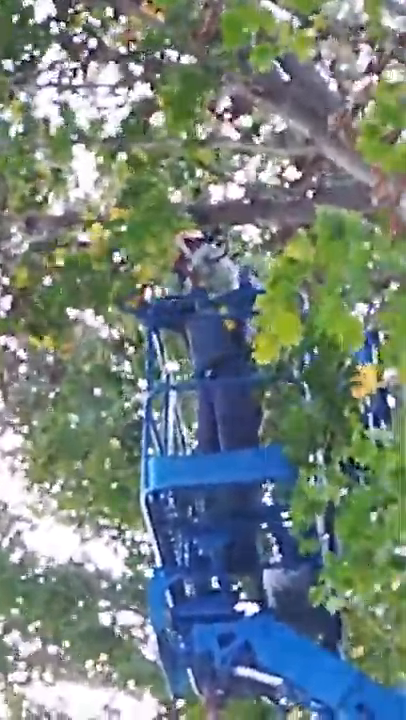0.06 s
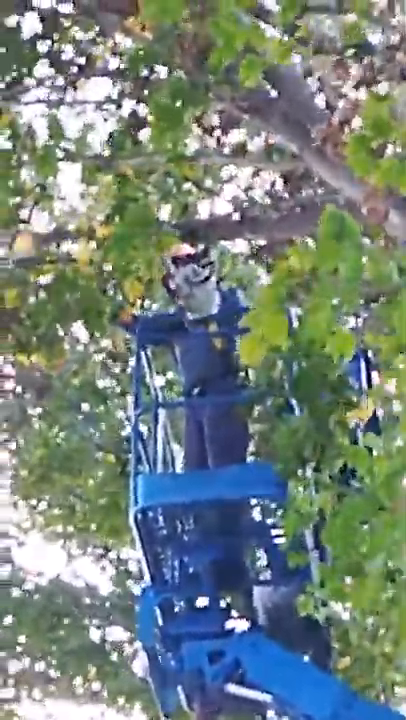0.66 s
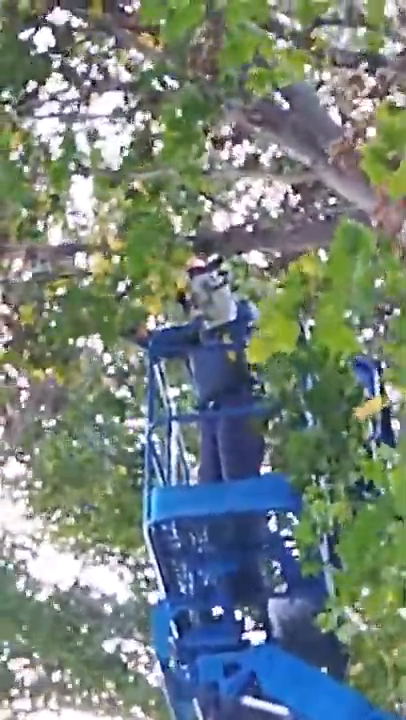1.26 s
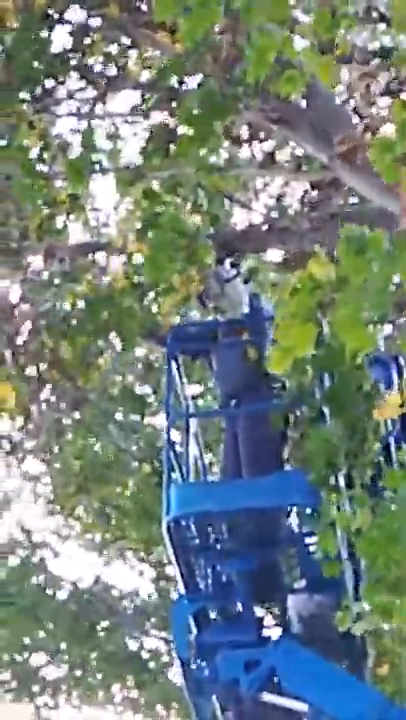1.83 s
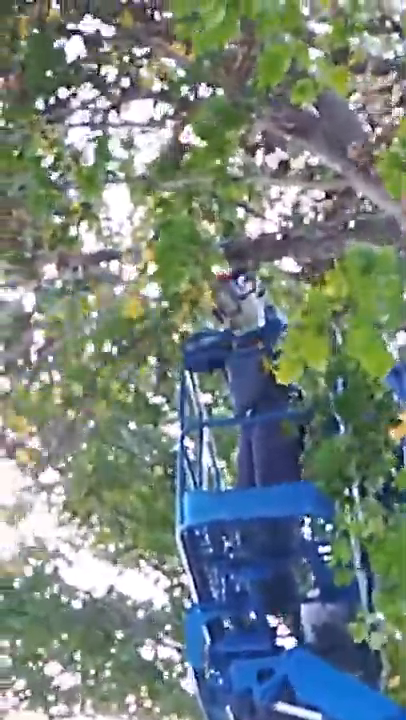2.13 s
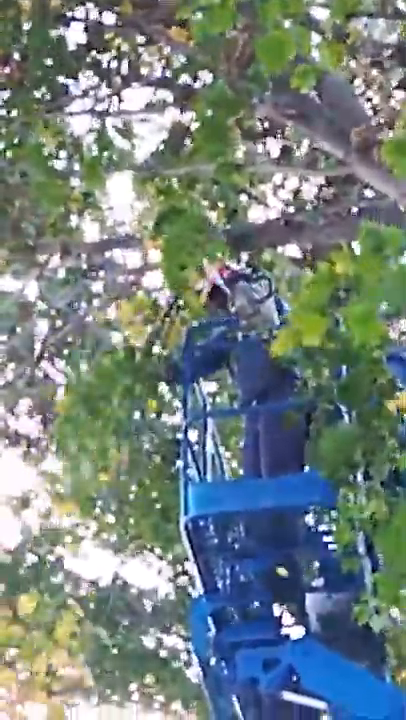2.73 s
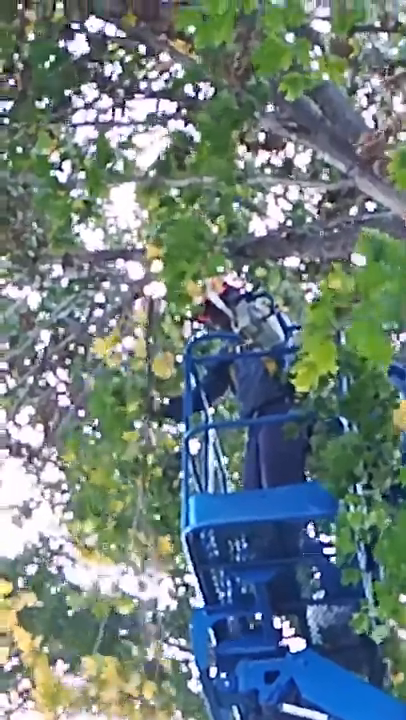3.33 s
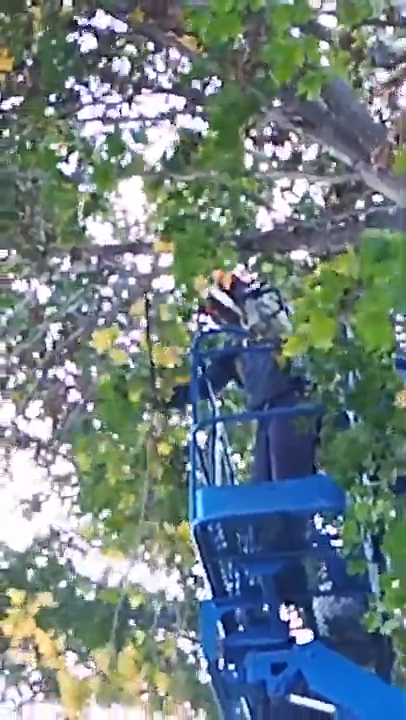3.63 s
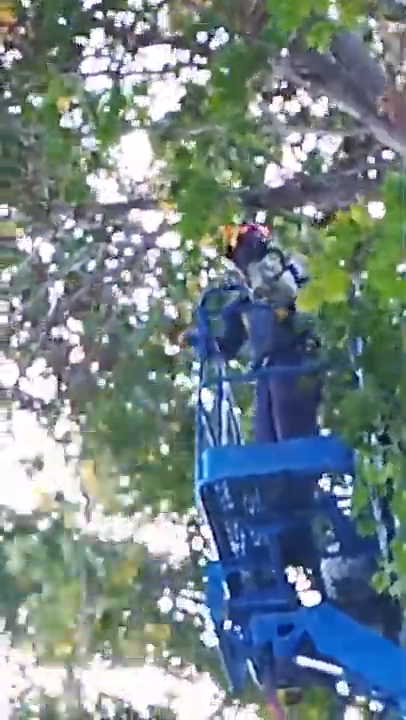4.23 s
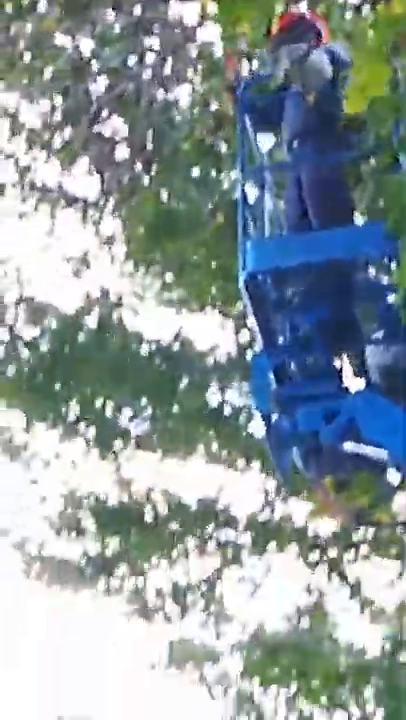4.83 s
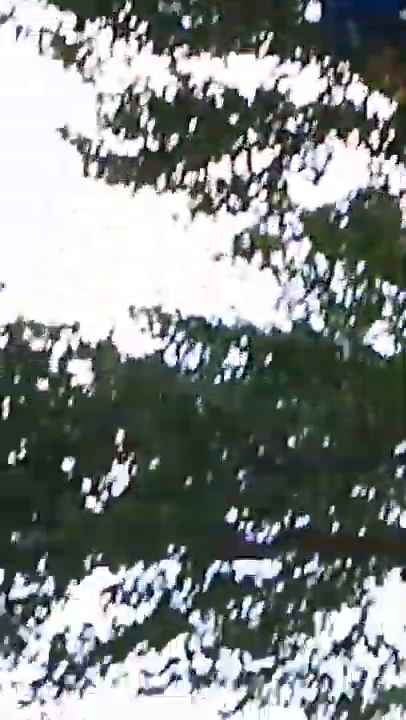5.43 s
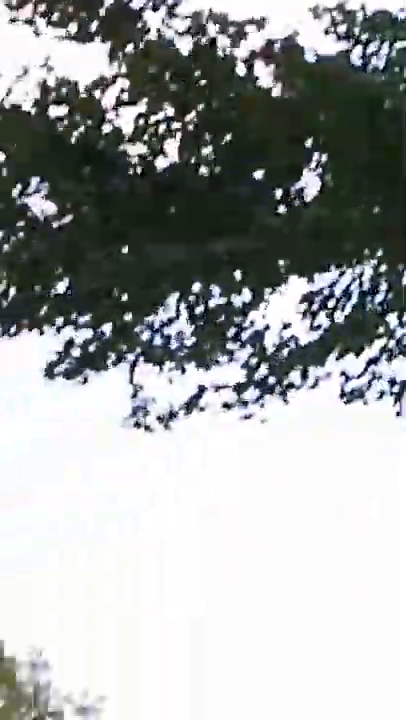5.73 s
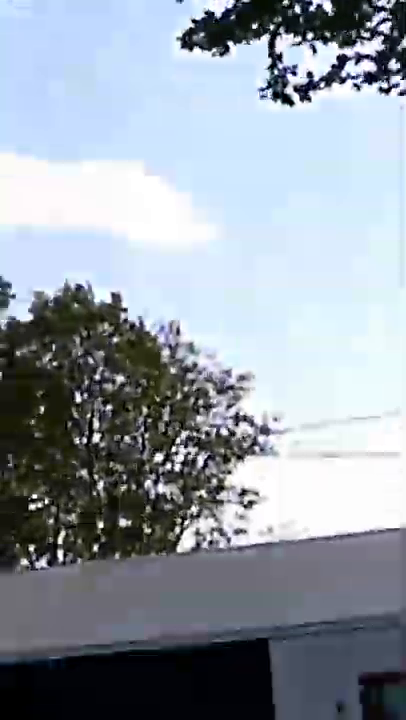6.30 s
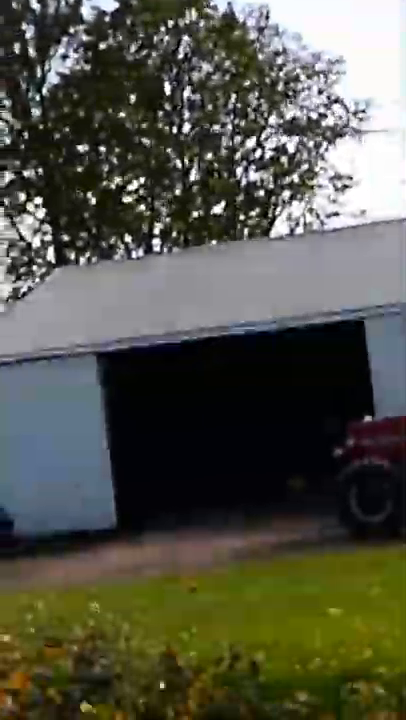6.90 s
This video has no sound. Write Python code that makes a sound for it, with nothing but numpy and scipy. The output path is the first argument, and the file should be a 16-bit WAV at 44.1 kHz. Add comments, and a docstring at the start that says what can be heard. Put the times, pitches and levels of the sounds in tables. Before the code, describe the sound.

A two-stroke chainsaw idles up in a tree, with dry, uneven pops and a light jingle of loose chain, echoing briefly around an open yard. At about 0.9 seconds it revs up hard, rising quickly to a loud, rasping whine with a bright chain hiss. Near top speed, from about 1.8 seconds, it misfires and stutters. The throttle shuts at 2.2 seconds and the pitch falls as the saw coasts down, the hiss fading by about 3 seconds. The stumbling idle then continues to the end at about 7 seconds. The chain grazes twigs with short, hissing rasps around 3.3 to 3.6 seconds and again at 5.3. A low engine drones steadily underneath the whole time. Wind rumbles on the microphone, with frequent short buffeting gusts from about 3.4 seconds onward, the hardest near 6.1.

```python
"""A two-stroke chainsaw up in a tree, worked from a lift. It idles in uneven pops, revs up once,
misfires at top speed, coasts down, and later rasps briefly against twigs. Each burst of burnt fuel
rings in the muffler and echoes off the ground and the yard, while the steel chain hisses and rattles.
A low engine drones below, and wind buffets the microphone."""
import sys
import numpy as np
from scipy import signal
from scipy.fft import rfft, irfft
from scipy.io import wavfile
from scipy.ndimage import uniform_filter1d

SR = 44100
rng = np.random.default_rng(int(sys.argv[2]) if len(sys.argv) > 2 else 0)


def to_wav(s):
    """Save 16-bit WAV."""
    ch = np.atleast_2d(s).T  # columns
    pcm = np.round(np.clip(ch, -1, 1) * 32767)  # PCM
    wavfile.write(sys.argv[1], SR, pcm.astype(np.int16))


N = 311346
TIME = np.arange(N) / SR
FREQS = np.arange(N // 2 + 1) * SR / N
THROTTLE_OPENS_S, THROTTLE_SHUTS_S, THROTTLE_TRAVEL_S = 0.906, 2.185, 0.013
CLUTCH_GRIPS_S, CLUTCH_SLIP_S, CLUTCH_FREES_S = 0.888, 0.17, 2.68


# How fast the engine turns with the trigger held: time_s, turns_per_s
REV_UP = [(0.93, 68.5), (1.17, 122.2), (1.3, 147), (1.37, 159), (1.43, 159.9), (1.47, 162.7),
          (1.518, 163.1), (1.694, 168.4), (1.892, 171), (2.0, 164.6), (2.032, 168.3), (2.118, 170),
          (2.15, 175), (2.183, 177)]
def crank_speed():
    """Turns per second: the throttle drives them up, then friction brakes them, less and less."""
    brake_turns_per_s2, eases_s, slowest = 304, 0.7, 50
    coasted_s = np.maximum(TIME - REV_UP[-1][0], 0)
    lost = brake_turns_per_s2 * eases_s * (1 - np.exp(-coasted_s / eases_s))
    return np.maximum(in_time(REV_UP)[0] - lost, slowest)


def by_speed(level_db, db_per_doubling):
    """Faster is louder: a gain that would reach level_db at 201.4 turns per second."""
    return from_db(level_db + db_per_doubling * np.log2(crank_speed() / 201.4))


# Strength that misfiring strokes lose (0 to 1): time_s, every_second, every_third, after_the_third
MISFIRES = [(1.0, .2, 0, 0), (1.3, .1, 0, 0), (1.42, .35, 0, 0), (1.75, .45, .05, 0), (1.83, .15, .15, 0),
            (1.86, 0, .9, 0), (1.97, 0, .95, .2), (2.01, 0, .85, .65), (2.14, 0, .85, .6),
            (2.18, 0, .6, .2), (2.2, 0, 0, 0)]
def strokes(jitter_s, uneven_db, waver):
    """One kick per engine turn. Misfiring weakens every second kick, then one or two in three."""
    turns = np.floor(np.cumsum(crank_speed() * (1 + waver * drift(22))) / SR)
    at = np.flatnonzero(np.diff(turns))
    second, third, after = (np.clip(loss[at], 0, 1) for loss in in_time(MISFIRES))
    count = np.arange(len(at))
    sizes = (1 - second * (count % 2)) * (1 - third * (count % 3 == 0)) * (1 - after * (count % 3 == 1))
    time_slip, size_slip = rng.standard_normal((2, len(at))) * (1 + 1.2 * third)
    return clicks(at / SR + jitter_s * time_slip, sizes * from_db(uneven_db * size_slip))


# Hoarse rushing gas, compared with the kicks: time_s, level_db
GAS_RUSH = [(.93, 3), (1.1, -6), (1.35, -15), (1.51, -16), (1.6, -4), (1.68, -7), (1.8, -14), (1.9, -7),
            (2.03, -3), (2.17, -5), (2.24, -15), (2.8, -12)]
# The muffler's tone when the engine works hard, and when it runs easy: pitch_hz, level_db
HARD_TONE = [(165, -8), (330, -20), (460, -17), (650, -10), (830, -2.5), (1030, -1), (1250, 0), (1450, -2),
             (1750, -11), (2030, 1), (2200, -4), (2470, 4), (2800, -9), (3500, -6), (4500, -17),
             (7000, -14), (16000, -40)]
EASY_TONE = [(150, 1.5), (400, 2), (620, 3), (850, 7.5), (1080, 9), (1330, 7), (1600, 5), (1800, 9),
             (2400, -0.5), (3000, -9.5), (7000, -1.5), (16000, -21)]
# The exhaust's main note and its upper whine: time_s, pitch_hz, level_db
PIPE_NOTE = [(.95, 840, -8), (1.02, 596, -14), (1.08, 855, 2), (1.16, 1050, -10), (1.26, 1140, -7),
             (1.38, 1210, -3), (1.52, 1270, 3), (1.6, 1400, -33), (1.8, 1280, -12), (2.16, 1250, -17),
             (2.25, 1850, -9), (2.45, 1620, -15), (2.62, 1370, 6), (2.8, 1250, -10)]
PIPE_WHINE = [(1.2, 2340, -24), (1.41, 2320, -14), (1.48, 2320, -5), (1.57, 2360, -8), (1.65, 2150, -10),
              (1.73, 2470, -15), (1.83, 2400, -9), (1.96, 1950, -9), (2.08, 2350, -14), (2.17, 2240, -17),
              (2.22, 2400, -26)]
def exhaust(kicks, dying_s):
    """Each stroke sends a sharp blow and a puff of gas through the muffler. Load hardens the tone."""
    puffs = level_out(die_away(kicks, decay_s=0.004) * rng.standard_normal(N))
    flow = chambers(level_out(kicks) + from_db(in_time(GAS_RUSH)[0]) * puffs, feedback=.45)
    released = ramp(THROTTLE_SHUTS_S, THROTTLE_TRAVEL_S)
    driven = ramp(THROTTLE_OPENS_S, THROTTLE_TRAVEL_S) - released
    coasting = released * (1 - ramp(CLUTCH_FREES_S, dying_s))
    misfiring = np.clip(in_time(MISFIRES)[1], 0, 1)
    pull = np.minimum(crank_speed() / 140, 1) ** 3.1  # full from 140 turns per second
    load = np.clip(driven * pull * (1 - 0.56 * misfiring) + coasting * 0.07, 0, 1)
    muffled = load * body(flow, HARD_TONE) + (1 - load) * body(flow, EASY_TONE)
    note = pipe_resonance(flow, PIPE_NOTE, decay_s=0.0025)
    whine = pipe_resonance(flow, PIPE_WHINE, decay_s=0.0028)
    choked_db = -5 * (1 - ramp(THROTTLE_OPENS_S, .16))  # extra fuel takes a moment to clear
    gain = driven * by_speed(-23, 4.3) * from_db(choked_db - 4 * misfiring)
    gain += coasting * by_speed(-29, 8.2)
    roar = level_out(muffled[0] + note + whine) * gain
    return outdoors(roar, echo_db=-9, echo_cut_hz=3200, scatter_db=-11, fade_s=.35)


def pipe_resonance(flow, curve, decay_s):
    """A ringing note that rises as the gas heats and sinks as it cools."""
    hz, level_db = in_time(curve)
    return from_db(level_db) * level_out(ring(flow, hz, decay_s).real)


# The sound's trip across each muffler chamber and back: delay_s
ROUND_TRIPS = [.00037, .00083, .00131, .00197]
def chambers(flow, feedback):
    """Each blow bounces between the muffler's walls and leaves spread over a few milliseconds."""
    for trip_s in ROUND_TRIPS:
        loop = np.r_[1, np.zeros(int(trip_s * SR) - 1), -feedback]
        flow = signal.lfilter(loop[::-1], loop, flow)
    return flow


# At idle the engine fires about every fourth turn, with stumbles: start_s, bark_db, crack_db
IDLE_POPS = [(0.0112, -35.5, -24), (0.0934, -38, -28.5), (0.1597, -36, -28.5), (0.23, -39, -25),
             (0.282, -35.5, -29), (0.3498, -43, -23), (0.432, -40, -28), (0.4982, -43, -29),
             (0.598, -38, -34), (0.6657, -37.5, -29), (0.7302, -35, -26.5), (0.7958, -36.5, -24),
             (0.8615, -35, -24), (2.9557, -36.5, -29), (3.1248, -36.5, -34), (3.2275, -37.5, -26.5),
             (3.3263, -41, -24.5), (3.4119, -34.5, -28), (3.506, -46, -33), (3.5677, -37, -26),
             (3.6515, -37.5, -27), (3.796, -39, -58), (3.8739, -39.5, -30.5), (3.954, -35, -28),
             (4.0294, -40, -31.5), (4.0854, -38, -33), (4.1614, -37, -34), (4.235, -41, -36),
             (4.352, -41.5, -39), (4.4087, -48, -46), (4.4713, -35, -30.5), (4.548, -36.5, -29),
             (4.6215, -37, -30.5), (4.6957, -36.5, -39), (4.7709, -36.5, -30.5), (4.8459, -36, -29),
             (4.9186, -36, -33), (4.976, -37.5, -32), (5.0492, -35.5, -29.5), (5.123, -35, -24),
             (5.1942, -38, -27.5), (5.2666, -36.5, -28), (5.3385, -43, -26.5), (5.3945, -35, -30),
             (5.4647, -40, -23), (5.5362, -38.5, -29.5), (5.6047, -38.5, -26.5), (5.674, -43, -35),
             (5.7459, -37, -29), (5.8175, -41, -26), (5.887, -40, -31), (5.9553, -39.5, -29),
             (6.0232, -41, -28), (6.089, -40, -29), (6.1597, -41.5, -29), (6.2426, -44, -34),
             (6.2946, -40.5, -30), (6.3634, -49, -32), (6.432, -54, -32), (6.5025, -44, -34),
             (6.5719, -39, -31), (6.6568, -48, -33), (6.7374, -40.5, -30), (6.804, -42, -31),
             (6.857, -37, -27.5), (6.9253, -40, -27), (6.9794, -39, -25.5), (7.048, -46, -24)]
# The tone of the pop at the outlet, and of its sharp crack: pitch_hz, level_db
POP_TONE = [(150, -18), (500, -13), (820, 1.5), (1080, -13), (1270, 2.5), (1700, -2), (2120, 0),
            (2400, -20), (3100, -4.5), (4500, -40), (9000, -33), (16000, -43)]
CRACK_TONE = [(1500, -1), (3200, -9), (4800, -7), (6500, 6.5), (8000, 0), (11000, -18), (16000, -25)]
def idle(pop_db, ring_db, gas_db, crack_db, shake_db):
    """Lone firings: a dry pop, the muffler's ring, a sharp crack and a shake of the slack chain."""
    times, bark_db, sharp_db = np.transpose(IDLE_POPS)
    kicks = clicks(times, from_db(bark_db))
    kicks += dead_strokes(times, turns_per_s=58, size_db=-54, uneven_db=2.5)
    gas = from_db(gas_db) * die_away(kicks, decay_s=.0016) * rng.standard_normal(N)
    pop = from_db(pop_db) * body(kicks + gas, POP_TONE)
    ringing = from_db(ring_db) * muffler_ring(times, bark_db, uneven_db=2.2)
    bark = outdoors(pop + ringing, echo_db=-12, echo_cut_hz=5000, scatter_db=-6, fade_s=.4)
    sharp = clicks(times, from_db(sharp_db))
    snap = from_db(crack_db) * die_away(sharp, decay_s=.0014)
    shake = from_db(shake_db) * die_away(sharp, decay_s=.02)
    crack = body((snap + shake) * stereo_noise(alike=0.11), CRACK_TONE)
    return bark + outdoors(crack, echo_db=-1, echo_cut_hz=9000, scatter_db=-7.5, fade_s=.35)


def dead_strokes(times, turns_per_s, size_db, uneven_db):
    """Between firings the engine keeps turning, and each unfired stroke gives a weak puff."""
    puff_times = []
    for start, end in zip(times, times[1:]):
        if end - start < .5:  # skip the long gap where the saw revs
            turns = max(round((end - start) * turns_per_s), 1)
            puff_times.extend(np.linspace(start, end, turns + 1)[1:-1])
    sizes = from_db(size_db + uneven_db * rng.standard_normal(len(puff_times)))
    return clicks(np.array(puff_times), sizes)


# The four notes the muffler rings with: pitch_hz, level_db, decay_s
MUFFLER_NOTES = [(840, -4, 0.0015), (1335, -1, 0.0028), (1810, -6.5, 0.0022), (2056, -2.5, 0.0042)]
# The tone shifts as saw and listener turn: time_s, ground_echo_s, then a pitch_ratio for each note
NOTE_SHIFTS = [(0, .0108, .95, 1.03, 1, 1.08), (.8, .0112, .95, 1.03, 1, 1.02),
               (3.4, .012, .97, 1.01, 1.02, 1), (4.1, .011, 1, .96, 1, 1),
               (5.05, .0105, 1.03, .95, .88, .97), (5.45, .0102, 1.02, 1.05, .88, 1.03),
               (6.25, .0088, 1, 1, 1, 1.02), (6.95, .0098, 1, .94, 1, .98)]
# How strongly the notes are heard: time_s, then a level_db for each note
NOTE_LEVELS = [(0, 1, 0.5, -2, -2), (.55, 6, 1, -9, -12), (.8, 2, 1.5, 0, 0), (3.3, -5, 1, 2, 0),
               (4.3, -6, -2.5, -3, 0.5), (5.4, 1, 1.5, -4, -1), (6.2, -2, 0.5, -2, 2), (7, -5, 4, -1, 0)]
# Bounces off nearby surfaces, timed from the ground echo: offset_s, level_db
NEAR_BOUNCES = [(-.0022, -7), (0, 0), (.006, -10)]
def muffler_ring(times, bark_db, uneven_db):
    """Each pop rings the muffler. The outlet faces away, so the ring is heard off nearby surfaces."""
    ground_s, *tunings = in_time(NOTE_SHIFTS)
    offset_s, bounce_db = np.transpose(NEAR_BOUNCES)
    arrivals = (times + np.interp(times, TIME, ground_s))[:, None] + offset_s
    arrivals += .00012 * rng.standard_normal(arrivals.shape)
    ringing = 0
    for (hz, db, decay_s), tuning, level_db in zip(MUFFLER_NOTES, tunings, in_time(NOTE_LEVELS)):
        strike_db = bark_db + uneven_db * rng.standard_normal(len(times))
        strikes = clicks(arrivals.ravel(), from_db(strike_db[:, None] + bounce_db).ravel())
        ringing += from_db(db + level_db) * ring(strikes, hz * tuning, decay_s).imag
    return ringing


# The tone of the chain running on its bar: pitch_hz, level_db
CHAIN_TONE = [(400, -32), (900, -25), (1500, -23.5), (2000, -20), (2750, -14.5), (3300, -4.5), (4200, -10),
              (5100, -12), (6000, -3), (7100, 0), (8200, -9), (9200, -10), (10800, -23), (14500, -21),
              (16000, -24)]
def running_chain(kicks, throb, knock_db):
    """Steel hisses and knocks, swelling with each stroke and with speed, until the clutch lets go."""
    pulsing = 1 + throb * (level_out(die_away(kicks, decay_s=0.0022)) - 0.5)
    rattle = stereo_noise(alike=0.02) + from_db(knock_db) * links(per_s=1900, spread_db=4.5)
    stopping_db = -89 * np.maximum(TIME - CLUTCH_FREES_S, 0)
    clutch = ramp(CLUTCH_GRIPS_S, CLUTCH_SLIP_S) * from_db(stopping_db)
    return body(rms_one(rattle * pulsing), CHAIN_TONE) * by_speed(-16, 6.5) * clutch


def links(per_s, spread_db):
    """Chain links knock at random moments; spread_db makes their force uneven."""
    sizes = from_db(spread_db * np.minimum(rng.exponential(1, N), 4)) * rng.choice([-1, 1], N)
    return rms_one(sizes * (rng.random(N) < per_s / SR))


# The chain touches twigs: start_s, level_db, rise_s, decay_s
TWIG_TOUCHES = [(3.31, -18, 0.042, 0.084), (3.529, -25, 0.058, 0.095), (3.63, -37, 0.063, 0.0061),
                (5.325, -23.5, 0.041, 0.11)]
# The tone of that scraping: pitch_hz, level_db
TWIG_TONE = [(1180, -58), (2000, -11.5), (2110, -13), (2490, -15.5), (3310, -7.5), (4860, -8), (7000, 5),
             (9740, -10.5), (11000, -18.5), (14400, -19), (16000, -28)]
def rasps(knock_db):
    """Teeth graze twigs: a quick swell of hiss and fine clicks that dies away."""
    swell = sum(from_db(db) * ramp(start, rise) ** 2 * fade_after(start + rise, decay)
                for start, db, rise, decay in TWIG_TOUCHES)
    scrape = stereo_noise(alike=0.037) + from_db(knock_db) * links(per_s=2400, spread_db=0)
    return swell * body(rms_one(scrape), TWIG_TONE)


# How loud the jingle is: time_s, level_db
JINGLE_LEVELS = [(0, -36), (.9, -35), (2.85, -39.5), (3.3, -38.5), (3.8, -43.5), (4.5, -39), (5.7, -38.5),
                 (6.32, -36.5), (6.7, -41.5), (7.06, -33.5)]
# The tone of the loose steel: pitch_hz, level_db
JINGLE_TONE = [(1400, -12.5), (2500, -8), (3400, -1), (4700, -7), (5800, 1), (7200, 3), (8400, -6.5),
               (9300, -6), (10800, -21.5), (14000, -18.5), (16000, -24)]
def jingle(knock_db, level_db, flutter_db):
    """The engine keeps the chain and clutch jingling."""
    rattle = rms_one(stereo_noise(alike=0.012) + from_db(knock_db) * links(per_s=370, spread_db=1))
    gain = from_db(in_time(JINGLE_LEVELS)[0] + level_db + flutter_db * drift(16))
    return body(rattle, JINGLE_TONE) * gain


# Notes of the bar and clutch drum: peak_s, pitch_hz, width_hz, level_db, half_length_s
STEEL_NOTES = [(.1, 9120, 120, -46, .13), (.56, 9120, 120, -44, .17), (.55, 1810, 50, -49.5, .25),
               (2.3, 3300, 200, -36, .08), (2.45, 3200, 170, -31, .08), (2.68, 3300, 260, -44, .07),
               (2.68, 9050, 110, -41, .08), (2.6, 13750, 150, -52, .13), (2.75, 1780, 70, -50, .12),
               (5.2, 5300, 230, -47, .05), (5.61, 5350, 260, -44, .02), (5.68, 5250, 260, -42, .025),
               (6.2, 9150, 170, -53, .7), (6.6, 3450, 170, -53, .4)]
def singing_steel(flutter_db):
    """Rubbing makes single notes of the steel swell and fade, in fits."""
    rubbing = rfft(stereo_noise(alike=0.94) * from_db(flutter_db * drift(22)))
    singing = 0
    for peak_s, hz, width_hz, db, half_length_s in STEEL_NOTES:
        swell = np.exp(-.5 * ((TIME - peak_s) / half_length_s) ** 2)
        note = rms_one(irfft(rubbing / (1 + ((FREQS - hz) / width_hz) ** 2), N))
        singing += from_db(db) * swell * note
    return singing


# Echoes from the ground and walls: delay_s, level_db, right_ear_extra_s
YARD_ECHOES = [(.0119, -2, .00002), (.029, -17, .0005)]
def outdoors(sound, echo_db, echo_cut_hz, scatter_db, fade_s):
    """Direct sound, dull echoes, and a thin scatter from the leaves that falls 60 dB in fade_s."""
    t = TIME[:SR // 2]
    echoes = np.zeros((2, len(t)))
    for delay_s, level_db, extra_s in YARD_ECHOES:
        echoes[0, int(delay_s * SR)] += from_db(echo_db + level_db)
        echoes[1, int((delay_s + extra_s) * SR)] += from_db(echo_db + level_db)
    response = signal.sosfilt(signal.butter(1, echo_cut_hz, fs=SR, output="sos"), echoes)
    scatter = rng.standard_normal(echoes.shape) * from_db(-60 * t / fade_s)
    response += from_db(scatter_db) * scatter / np.linalg.norm(scatter[0])
    response[:, 0] += 1  # the direct sound
    response /= np.linalg.norm(response[0])
    return signal.oaconvolve(sound * np.ones((2, 1)), response, axes=-1)[:, :N]


# How much louder the saw is on the left: pitch_hz, left_minus_right_db
SAW_BALANCE = [(300, -14.5), (1400, 6), (2600, -1), (3800, 1.5), (6200, 1.5), (7500, -6), (9900, -6),
               (11500, 1.5), (15500, -5.5)]
def at_the_ears(saw):
    """Some pitches of the saw lean to the left, others to the right."""
    return irfft(rfft(saw) * from_db(at_hz(SAW_BALANCE, FREQS) * [[.5], [-.5]]), N)


# The breeze between gusts: time_s, level_db
BREEZE_LEVELS = [(0, -32), (.6, -36.5), (1.6, -33), (2.2, -39), (2.6, -30.5), (3.3, -31), (3.6, -32.5),
                 (3.9, -23.5), (4.5, -32.5), (4.9, -37), (5.25, -34), (5.42, -52), (5.9, -31), (6.7, -28.5),
                 (7.06, -35.5)]
# Sudden gusts: start_s, length_s, level_db, brightness_db, tearing (0 to 1)
WIND_GUSTS = [(0.408, 0.03, -31, 8, 0), (1.395, 0.029, -32, -8, 0.1), (1.685, 0.087, -35, 9.5, 0.74),
              (2.53, 0.13, -24.5, -33, 0.1), (2.68, 0.092, -31, -11, 0.1), (3.159, 0.058, -28.5, -0.5, 0.2),
              (3.451, 0.027, -17, 2.5, 0.4), (3.498, 0.025, -29, 8.5, 0.4), (3.688, 0.047, -26.5, 10, 0.6),
              (3.736, 0.048, -23, 7.5, 0.57), (3.85, 0.031, -24.5, 4, 0.17), (3.894, 0.035, -23.5, 3, 0.4),
              (3.98, 0.021, -28.5, 10, 0.15), (4.033, 0.027, -27, 10, 0.24), (4.09, 0.022, -25, 8.5, 0.12),
              (4.155, 0.031, -30, 8, 0.34), (4.274, 0.022, -26.5, 12, 0.12), (4.395, 0.04, -24, 1.5, 0.27),
              (4.621, 0.036, -17, -7, 0), (4.674, 0.06, -23, 1.5, 0.54), (4.756, 0.027, -20, -3.5, 0.28),
              (4.804, 0.037, -22, -3.5, 0.2), (4.885, 0.01, -21, -1, 0), (4.953, 0.032, -27, 8.5, 0.23),
              (5.165, 0.015, -21, -3, 0), (5.213, 0.061, -24, -14, 0), (5.501, 0.076, -23.5, 0, 0.03),
              (5.581, 0.12, -26.5, 1.5, 0.26), (5.714, 0.19, -24.5, -3, 0),
              (6.10, 0.023, -13.5, -10.5, 0.14), (6.194, 0.033, -23, -5, 0), (6.316, 0.059, -19, -23, 0.1),
              (6.402, 0.051, -23, -0.5, 0), (6.551, 0.043, -17.5, -4, 0.1), (6.573, 0.07, -24, 1.5, 0.85),
              (6.653, 0.07, -27, 3.5, 0.87), (6.748, 0.063, -26, -0.5, 0.2)]
# The tones of swirling air, from big swirls to small: pitch_hz, level_db
RUMBLE_TONE = [(12, -18), (25, -9), (45, -4), (72, 1), (115, -2), (150, -13), (250, -38), (1000, -80),
               (4000, -110)]
BUFFET_TONE = [(70, -33), (125, -1), (170, -0.5), (240, -3.5), (350, -9.5), (500, -16.5), (800, -26.5),
               (1600, -73), (6000, -100)]
TEAR_TONE = [(30, -12.5), (80, 2.5), (220, -10), (400, -9), (700, -8), (1300, -24), (2000, -29.5),
             (6000, -100)]
def wind(rumble_db, buffet_db, tear_db, breeze_bright_db, restless_db, left_db):
    """Big swirls of air rumble, small ones buffet, and hard gusts add a higher tearing sound."""
    breeze = from_db(in_time(BREEZE_LEVELS)[0] + restless_db * drift(24))
    big_power = breeze ** 2
    small_power = (breeze * from_db(breeze_bright_db + restless_db * drift(4.3))) ** 2
    tearing = 0
    for start, length, db, bright_db, tears in WIND_GUSTS:
        gust = from_db(db) * ramp(start, 0.012) * fade_after(start + length, decay_s=0.01)
        big_power += gust ** 2
        small_power += (gust * from_db(bright_db)) ** 2
        tearing += gust * from_db(bright_db) * tears
    rumble = from_db(rumble_db) * np.sqrt(big_power) * swirls(RUMBLE_TONE, lumpy_db=0.5, alike=0.93)
    buffet = from_db(buffet_db) * np.sqrt(small_power) * swirls(BUFFET_TONE, lumpy_db=5.5, alike=0.85)
    tear = from_db(tear_db) * tearing * swirls(TEAR_TONE, lumpy_db=8, alike=0.76)
    left, right = rumble + (buffet + tear) * from_db([[left_db / 2], [-left_db / 2]])
    return np.array([left, np.interp(TIME - .0008, TIME, right)])  # the right side feels it later


def swirls(tone, lumpy_db, alike):
    """Churning air: noise that flutters quickly around a steady average power."""
    noise = body(stereo_noise(alike) * from_db(lumpy_db * np.tanh(drift(110))), tone)
    return noise / np.sqrt(uniform_filter1d(np.mean(noise ** 2, axis=0), size=1500) + 1e-12)


# The notes of the low engine below: pitch_hz, level_db
DRONE_NOTES = [(67, -37.5), (100.5, -50), (134, -50)]
def drone(wander, waver_db):
    """An engine hums at a nearly steady speed."""
    clock = np.cumsum(1 + wander * drift(3)) / SR
    return sum(from_db(db + waver_db * drift(5)) * np.sin(2 * np.pi * hz * clock)
               for hz, db in DRONE_NOTES)


# The tone of the yard's background: pitch_hz, level_db
AIR_TONE = [(88, -39), (150, 0.5), (399, -24.5), (455, -10.5), (613, -18), (807, -15.5), (1070, -18),
            (1320, -20.5), (2600, -27), (3380, -94), (5720, -120)]
def yard_air(level_db):
    """A faint, steady, low hush."""
    return from_db(level_db) * body(stereo_noise(alike=0.29), AIR_TONE)


def from_db(db):
    """Turns decibels into a gain."""
    return 10 ** (np.asarray(db) / 20)


def rms_one(x):
    """Scales the average power to 1."""
    return x / np.sqrt(np.mean(x ** 2) + 1e-20)


def level_out(x):
    """Holds the short-term power at 1."""
    return x / np.sqrt(np.maximum(uniform_filter1d(x ** 2, size=2600), 0) + 1e-7)


def in_time(rows):
    """Each column of a timed table, filled in at every sample."""
    times, *columns = np.transpose(rows)
    return [np.interp(TIME, times, column) for column in columns]


def at_hz(points, hz):
    """Reads a tone table between its points, on a log-frequency scale."""
    known_hz, values = np.transpose(points)
    return np.interp(np.log(hz + 1), np.log(known_hz), values)


def ramp(start_s, length_s):
    """Rises from 0 to 1 and stays there."""
    return np.clip((TIME - start_s) / length_s, 0, 1)


def fade_after(start_s, decay_s):
    """Stays at 1, then dies away."""
    return np.exp(-np.maximum(TIME - start_s, 0) / decay_s)


def drift(rate_hz):
    """A smooth random wobble, about 1 in size."""
    return rms_one(irfft(rfft(rng.standard_normal(N)) / (1 + (FREQS / rate_hz) ** 2), N))


def stereo_noise(alike):
    """White noise, partly shared by both ears."""
    return np.sqrt(alike) * rng.standard_normal(N) + np.sqrt(1 - alike) * rng.standard_normal((2, N))


def clicks(times, sizes):
    """Kicks one sample long."""
    return np.bincount(np.clip(np.round(times * SR).astype(int), 0, N - 1), sizes, N) + 1e-18


def die_away(kicks, decay_s):
    """Gives each kick a fading tail."""
    return signal.lfilter([1], [1, -np.exp(-1 / (decay_s * SR))], kicks)


def ring(x, hz, decay_s):
    """Rings one note whose pitch can move. Use the real or imaginary part as sound."""
    turn = np.exp(2j * np.pi * np.cumsum(hz * np.ones(N)) / SR)
    return turn * die_away(x / turn, decay_s)


def body(x, tone, size=2048):
    """Gives a sound the tone in a table; white noise keeps its power."""
    cepstrum = irfft(np.log(from_db(at_hz(tone, np.arange(size // 2 + 1) * SR / size))))
    cepstrum[1:size // 2] *= 2  # minimum phase: it rings after a hit, never before
    cepstrum[size // 2 + 1:] = 0
    response = irfft(np.exp(rfft(cepstrum)))
    return signal.oaconvolve(np.atleast_2d(x), [response / np.linalg.norm(response)], axes=-1)[:, :N]


def scene():
    """Adds up the saw's parts, then the yard, the low engine and the wind."""
    kicks = strokes(jitter_s=.000014, uneven_db=1.5, waver=.003)
    saw = exhaust(kicks, dying_s=.26)
    saw += idle(pop_db=22, ring_db=6, gas_db=-23.5, crack_db=3.5, shake_db=-7.5)
    saw += running_chain(kicks, throb=0.058, knock_db=-13)
    saw += rasps(knock_db=-21)
    saw += jingle(knock_db=-21, level_db=-1, flutter_db=1.97)
    saw += singing_steel(flutter_db=2.5)
    background = yard_air(level_db=-41) + drone(wander=.025, waver_db=2.5)
    gusts = wind(rumble_db=-1, buffet_db=-0.5, tear_db=0.5,
                 breeze_bright_db=-3, restless_db=3.43, left_db=2.5)
    return at_the_ears(saw) + background + gusts


def record(dry):
    """Rounds off the hardest gusts and cuts the highest treble steeply."""
    ceiling, cutoff_hz = .85, 16000
    rounded = dry / (1 + (dry / ceiling) ** 4) ** .25
    return signal.sosfilt(signal.ellip(12, .1, 90, cutoff_hz, fs=SR, output="sos"), rounded)


dry = scene()
out = record(dry)
to_wav(out)
```